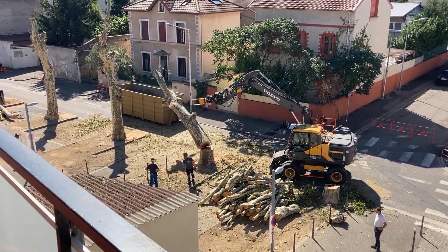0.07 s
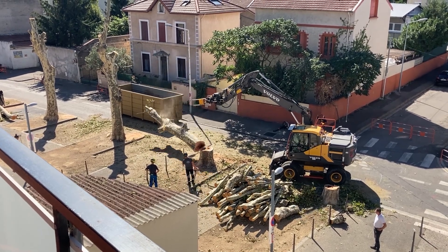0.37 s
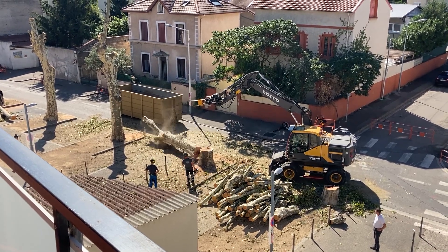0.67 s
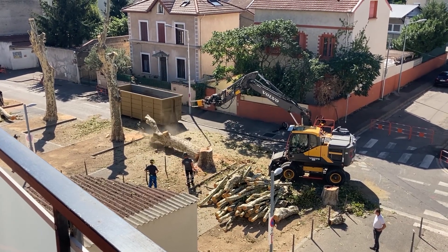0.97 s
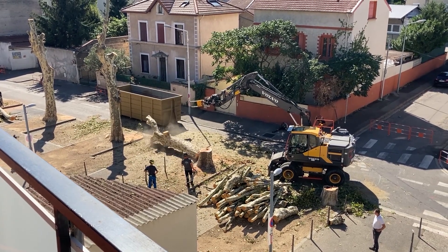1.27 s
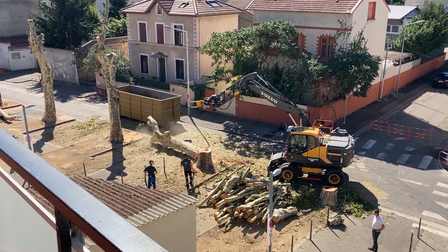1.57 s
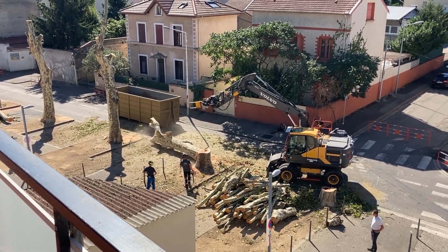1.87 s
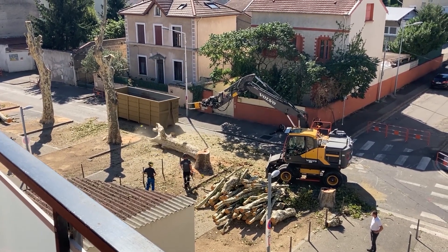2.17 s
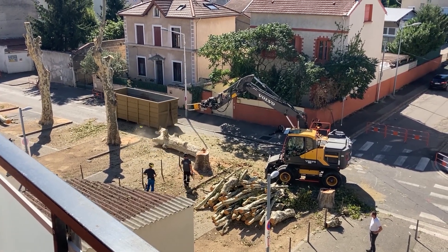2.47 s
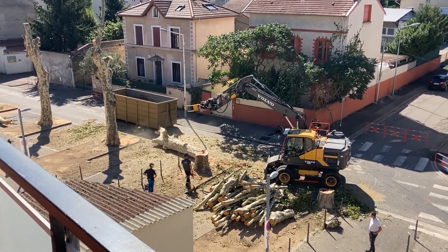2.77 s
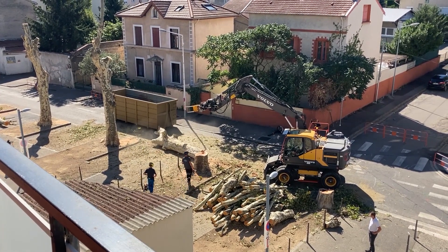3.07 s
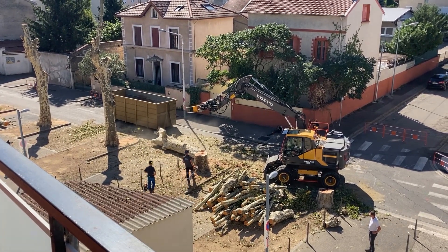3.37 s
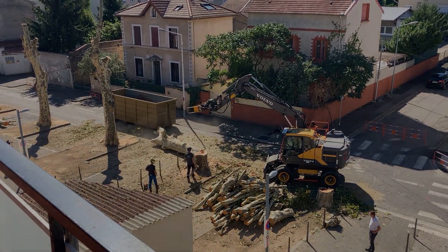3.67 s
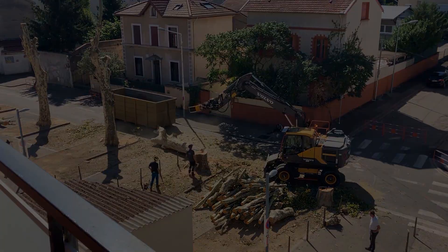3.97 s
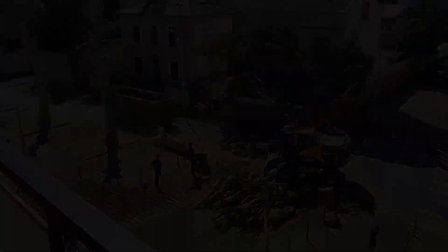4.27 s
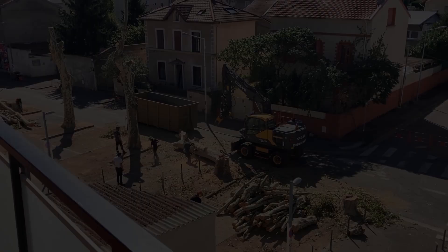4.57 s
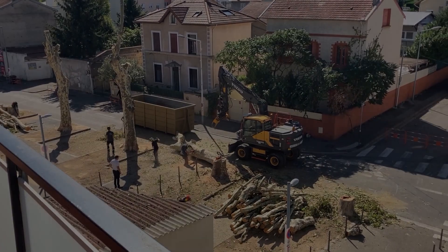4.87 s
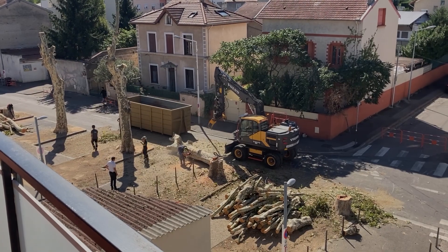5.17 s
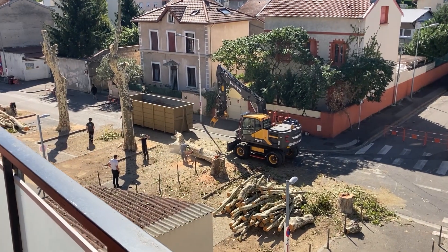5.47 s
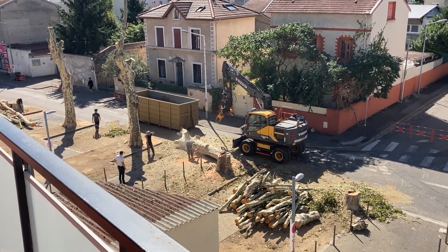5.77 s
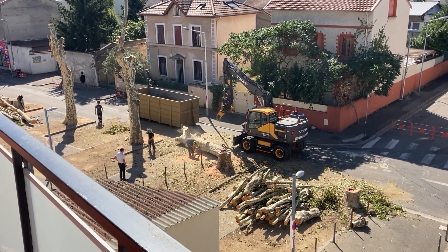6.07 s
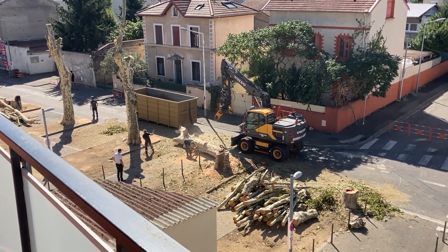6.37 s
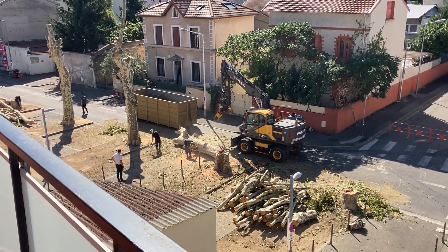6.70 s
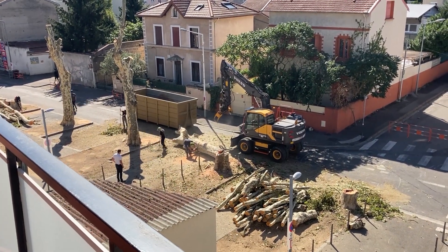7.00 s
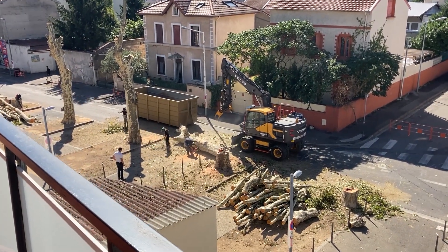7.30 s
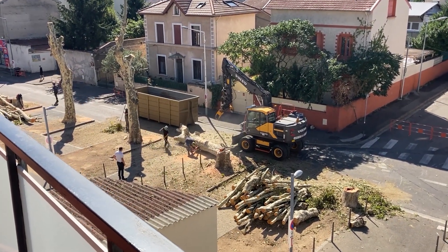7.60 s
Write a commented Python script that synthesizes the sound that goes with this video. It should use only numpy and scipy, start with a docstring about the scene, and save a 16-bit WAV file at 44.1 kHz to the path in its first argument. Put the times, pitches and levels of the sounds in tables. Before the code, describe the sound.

An excavator idles in the background of a street between houses. A felled tree trunk crashes to the ground and bounces, with deep thuds, ringing wood and crunching bark echoing off the house fronts, then rolls over with softer knocks. The street fades out and a loud, close chainsaw cuts in, its pitch sagging and rising as it tears wood and sprays hissing chips. Heard in stereo.

```python
"""A street between houses, heard in stereo, with an excavator idling in the background.
A felled trunk crashes down, bounces and later rolls over: the ground thuds, the log rings, bark crunches
and the house fronts echo. The street fades out; after a cut, a two-stroke chainsaw is in the foreground.
Its exhaust pulses ring muffler and casing while the chain tears wood and sprays chips,
the engine sagging as the chain bites and picking up as it is eased."""
import sys
import numpy as np
from scipy import signal
from scipy.fft import rfft, irfft, next_fast_len
from scipy.io import wavfile
from scipy.ndimage import uniform_filter1d

SR = 44100
rng = np.random.default_rng(int(sys.argv[2]) if len(sys.argv) > 2 else 0)


def materialize(psi):
    """Save the field psi as 16-bit PCM at rate SR to the path in sys.argv[1].

    A 1-D psi becomes a single channel; in a 2-D psi each row is a channel.
    """
    bounded = np.clip(np.atleast_2d(psi).T, -1, 1)
    quanta = np.round(bounded * 32767).astype(np.int16)
    wavfile.write(sys.argv[1], SR, quanta)


N = 345744
TIME = np.arange(N) / SR

# Levels in the tables are relative; each source adds its own gain.
# hum of the idling diesel: (frequency [Hz], level [dB])
DIESEL_HUM = [(44.5, -58.5), (88, -51.5), (133, -42), (192, -45.5), (267, -52.5), (402, -49.5)]
# resonances in the excavator's running noise: (frequency [Hz], level [dB], t60 [s])
EXCAVATOR_MODES = [(750, -53, .04), (1720, -59, .034), (2000, -65, 0.037), (2720, -60.5, .012)]
# background noise of excavator and street: (frequency [Hz], density [dB])
STREET_NOISE = [(24, -18.5), (45, -7.5), (96, -15), (130, -3.5), (160, -5.5), (271, -8.5), (347, -13.5),
                (408, -10), (490, -23.5), (780, -16.5), (2160, -28.5), (4000, -33.5), (5900, -44),
                (7500, -39), (10000, -41), (15000, -54.5)]
# stereo width of the street at the microphone: (frequency [Hz], side minus mid [dB])
STREET_WIDTH = [(30, -10), (70, -13), (150, -9.5), (300, -7), (950, -1), (2400, -2), (6000, 6)]
# the trunk lands, bounces and rolls over: (time [s], thud [dB], log ring [dB], bark crunch [dB])
TRUNK_BLOWS = [(.563, -38, -23.5, -30), (.574, -26, -9, -10.5), (.583, -18.5, -11, -20),
               (.592, -31, -13.5, -35), (.62, -40, -21, -16), (.645, -30, -11, -21.5),
               (.701, -22.5, -14, -36), (.819, -25, -18.5, -25), (.894, -18.5, -24.5, -31),
               (.965, -21, -24, -25.5), (1.024, -32, -46, -30.5), (1.197, -33, -50, -35),
               (2.328, -32, -24, -34), (2.343, -30, -20.5, -29.5), (2.423, -28.5, -36, -40),
               (2.546, -34, -28.5, -44), (2.735, -27.5, -39, -43)]
# thud of the ground: (frequency [Hz], density [dB])
GROUND_THUD = [(18, -31), (32, -16.5), (47, 0), (66, 0), (85, -13.5), (115, -2.5), (170, -30.5),
               (400, -48.5)]
# modes of the log: (frequency [Hz], level [dB], t60 [s])
TRUNK_MODES = [(126.4, -7.5, 0.44), (164.9, 3.5, 0.43), (189.5, 0, 0.39), (215, -7.5, 0.28),
               (244.4, -9, 0.62), (276.5, -10.5, 0.58), (360, -1.5, 0.078), (423.7, -12.5, 0.47),
               (542, -17, 0.091), (680, -27, 0.12), (769, -15, .16)]
# bark being crushed: (frequency [Hz], density [dB])
BARK_CRUNCH = [(100, -1), (300, 7), (650, 4.5), (1200, -3.5), (2300, -9.5), (3800, -15.5), (5800, -28.5),
               (8000, -21.5), (10500, -24.5), (15000, -43)]
# deep boom that lingers between the houses: (frequency [Hz], level [dB], t60 [s])
STREET_MODES = [(50.14, -8, 3.1), (64.4, -20, 0.82)]
# stubs of limbs hit the ground: (time [s], level [dB], contact brightness [Hz])
LIMB_HITS = [(.575, -11.5, 5530), (.609, -13, 3400), (0.818, -16.5, 1800), (0.832, -14.5, 1600),
             (.975, -33, 3020)]
# modes of the limbs: (frequency [Hz], level [dB], t60 [s])
LIMB_MODES = [(812, -3.5, 0.12), (906, -6, 0.11), (1142, -9, 0.13), (1330, -11.5, 0.21),
              (1443, -10.5, 0.18), (1890, -4.5, 0.055), (2260, -10.5, .07), (2410, -8, 0.13),
              (2740, -17.5, .06), (4100, -11, 0.027)]
# two thin snaps of twig and chip, between them a faint longer high hiss: (time [s], level [dB], t60 [s])
SNAPS_AND_HISS = [(2.573, -46, 0.065), (3.55, -56, .9), (5.319, -25, 0.025)]
# high hiss, also the sound of the snaps and flying chips: (frequency [Hz], density [dB])
HIGH_HISS = [(3500, -9), (5300, -7.5), (6100, -9.5), (7200, -2), (9000, -7), (12000, -10.5), (15000, -25)]
# speed of the saw's engine: (time [s], firing rate [Hz])
SAW_SPEED = [(4.38, 198), (4.49, 203), (4.72, 207), (4.91, 180), (5.13, 162), (5.27, 161), (5.7, 165),
             (5.8, 180), (6.04, 197), (6.1, 193), (6.27, 166), (6.35, 160), (6.52, 165), (6.6, 181),
             (6.69, 186), (6.92, 194), (7.0, 175), (7.09, 183), (7.17, 183), (7.25, 157), (7.38, 167),
             (7.43, 157), (7.45, 159), (7.48, 138), (7.51, 138), (7.61, 159), (7.72, 153), (7.84, 170)]
# the chain snags, the engine misfires: (time [s], half width [s], added spread [dB], tone loss [dB])
CHAIN_SNAGS = [(5.783, 0.015, 1.2, 3), (6.262, 0.064, 2.0, 0), (7.219, .04, 3, 7), (7.513, 0.093, 3.2, 0),
               (7.694, 0.027, 1, 7)]
# stereo width of the saw at the microphone: (frequency [Hz], side minus mid [dB])
SAW_WIDTH = [(60, -1), (170, -21.5), (310, -11.5), (640, -3), (1400, -2), (3100, -1.5), (6000, 4.5)]
# exhaust response that the firing tone and its octave sweep through: (frequency [Hz], level [dB])
EXHAUST_RESPONSE = [(138, -29), (152, -30), (161, -14.5), (174, -18), (190, -14.5), (206, -16), (280, -34),
                    (322, -21.5), (362, -18.5), (384, -38.5), (402, -25.5), (416, -36)]
# response of the muffler: (frequency [Hz], level [dB])
MUFFLER_RESPONSE = [(380, -28), (470, 4), (545, -0.5), (640, -0.5), (710, 3.5), (770, -24), (860, -11),
                    (930, -0.5), (975, -3.5), (1060, -18), (1300, -12.5), (1480, -7), (1550, -19),
                    (1630, -9), (1800, -37)]
# narrow resonance of the muffler outlet: (frequency [Hz], level [dB])
OUTLET_RESPONSE = [(690, -53), (750, 0.5), (830, 1.5), (890, -52)]
# response of the engine casing: (frequency [Hz], level [dB])
CASING_RESPONSE = [(850, -9), (1120, 2.5), (1400, -2.5), (1520, 6.5), (1780, -2), (2080, 5), (2400, -1.5),
                   (2750, -4), (3100, -3), (3600, 4), (4200, -6.5), (4750, -9.5), (5380, -0.5), (6200, -22)]
# thin metal of guide bar and cover, singing at high revs: (frequency [Hz], level [dB], t60 [s])
BAR_MODES = [(2860, 5, 0.04), (3700, -11, 0.07), (4690, 6.5, 0.019), (5550, -16, 0.033)]
# the chain tearing wood: (frequency [Hz], density [dB])
CHAIN_SPECTRUM = [(25, -5), (60, -8.5), (150, -0.5), (350, 5), (700, 2.5), (1150, -2), (2300, 2),
                  (3700, 0.5), (4300, 0.5), (4750, -37), (5050, -39), (5400, -51), (6500, -91)]
# bar and cover rubbed into ringing by the chain: (frequency [Hz], level [dB], t60 [s])
CHAIN_RING = [(1478, -6, 0.049), (2080, -1.5, 0.011), (2430, -4.5, 0.014), (3633, -3.5, 0.018),
              (4706, -3.5, .03), (5345, -7, 0.024)]
# strength of the chip spray: (time [s], level [dB])
CHIP_LEVEL = [(4.39, -32.5), (4.65, -31), (5.03, -34), (6.04, -33.5), (6.34, -38), (7.36, -34.5),
              (7.43, -39), (7.6, -33), (7.65, -38), (7.72, -34), (7.82, -34.5)]

WORKING_HZ = 175   # firing rate about which the saw's levels rise and fall
LEFT_RIGHT = np.array([[1], [-1]])


def from_db(db):
    """Decibels to gain."""
    return 10 ** (np.asarray(db) / 20)


def rms_one(x):
    """Scale to an rms of 1."""
    return x / np.sqrt(np.mean(x ** 2) + 1e-20)


def at_hz(spectrum, hz):
    """Level of a spectrum at the given frequencies, in dB."""
    at, db = np.transpose(spectrum)
    return np.interp(np.log(hz), np.log(at), db)


def colour(x, spectrum):
    """Shape x by a spectrum that falls away steeply beyond both ends."""
    size = next_fast_len(N + 4096)
    hz = np.arange(size // 2 + 1) * SR / size + 1e-3
    ends = np.minimum(1, hz / spectrum[0][0]) ** 2 * np.minimum(1, spectrum[-1][0] / hz) ** 2
    return irfft(rfft(x, size) * ends * from_db(at_hz(spectrum, hz)), size)[..., :N]


def drift(rate_hz):
    """Random wander of spread 1, mostly slower than rate_hz."""
    r = np.exp(-80 * np.pi * rate_hz / SR)
    slow = signal.lfilter([1], [1, -2 * r, r * r], rng.standard_normal(N // 40 + 2002))[2000:]
    return np.interp(np.arange(N) / 40, np.arange(len(slow)), rms_one(slow))


def stereo(mid, side, width):
    """Left and right from a middle and a side signal."""
    return mid + colour(side, width) * LEFT_RIGHT


def noise(spectrum, width):
    """Coloured stereo noise whose middle has an rms near 1."""
    return stereo(*rms_one(colour(rng.standard_normal((2, N)), spectrum)), width)


def reflections(x, t60, first_s, count):
    """Two unrelated sets of scattered echoes off houses and nearby surfaces, each of unit energy."""
    out = []
    for delay, size in zip(rng.uniform(0, .8, (2, count)), rng.standard_normal((2, count))):
        echoes = np.zeros(int((first_s + t60) * SR) + 2)
        np.add.at(echoes, ((first_s + delay * t60) * SR).astype(int), size * from_db(-60 * delay))
        out.append(signal.fftconvolve(x, echoes / np.linalg.norm(echoes))[:N])
    return np.array(out)


def strikes(times, sizes):
    """One click for each contact."""
    clicks = np.zeros(N)
    clicks[(times * SR).astype(int)] = sizes
    return clicks


def ring(clicks, hz, t60):
    """A unit click sets a sine of height 1 ringing."""
    r, w = from_db(-60 / (t60 * SR)), 2 * np.pi * hz / SR
    return signal.lfilter([0, np.sin(w)], [1, -2 * r * np.cos(w), r * r], clicks + 1e-18)


def rubbed(modes):
    """Modes kept ringing by noise, each at its own rms level."""
    return sum(from_db(db) * rms_one(ring(rng.standard_normal(N), hz, t60)) for hz, db, t60 in modes)


def bursts(times, levels_db, t60, rise_s):
    """Envelope of overlapping bursts that rise quickly and die away."""
    power = np.zeros(N)
    for s, db, decay_s in np.broadcast(times, levels_db, t60):
        start = int(s * SR)
        age = TIME[:N - start][:2 * SR]
        burst = from_db(db - 60 * age / decay_s) * (1 - np.exp(-age / rise_s))
        power[start:start + len(age)] += burst ** 2
    return np.sqrt(power)


def excavator(noise_db=-36.5, knock=0.035, waver_db=2.0, wander_rad=0.8):
    """A diesel idles in the background: wavering hum over noise that throbs with the firings."""
    hum = 0
    for hz, db in DIESEL_HUM:
        height = np.sqrt(2) * from_db(db + waver_db * drift(10))
        hum = hum + height * np.sin(2 * np.pi * hz * TIME + wander_rad * drift(0.86))
    throb = 1 + knock * np.cos(2 * np.pi * DIESEL_HUM[0][0] * TIME)
    return hum + rubbed(EXCAVATOR_MODES) + from_db(noise_db) * throb * noise(STREET_NOISE, STREET_WIDTH)


def trunk(ring_db=-2.5, limb_db=-5.5, wood_echo_db=-6.5, crunch_echo_db=-8.0):
    """Each blow shakes the ground, rings the log and crushes bark; the house fronts answer."""
    times, thud_db, wood_db, crunch_db = np.transpose(TRUNK_BLOWS)
    thud = noise(GROUND_THUD, STREET_WIDTH) * bursts(times, thud_db, t60=0.63, rise_s=0.0067)
    blows = strikes(times, from_db(wood_db + ring_db))
    log = sum((-1) ** k * from_db(db) * ring(blows, hz, t60)
              for k, (hz, db, t60) in enumerate(TRUNK_MODES))
    wood = log + from_db(limb_db) * limb_clacks()
    crunch = bark_crunch(times, crunch_db)
    to_houses = from_db(wood_echo_db) * wood + from_db(crunch_echo_db) * crunch.mean(axis=0)
    echoes = reflections(to_houses, t60=1.0, first_s=.008, count=900)
    return thud + wood + crunch + stereo(*echoes, STREET_WIDTH)


def bark_crunch(times, crunch_db, t60=0.2, splinter_hz=1400, lift_db=2.5, loss_per_db=0.18):
    """Bark gives way under each blow; the harder the blow, the more brightly it splinters."""
    grit = noise(BARK_CRUNCH, STREET_WIDTH)
    dull = signal.sosfiltfilt(signal.butter(2, splinter_hz, fs=SR, output="sos"), grit)
    splinter_db = crunch_db + lift_db + loss_per_db * (crunch_db - crunch_db.max())
    splinters = (grit - dull) * bursts(times, splinter_db, t60, rise_s=0.0019)
    return dull * bursts(times, crunch_db, t60, rise_s=0.0018) + splinters


def street_boom():
    """The ground thuds set the lowest resonances of the street going."""
    times, thud_db = np.transpose(TRUNK_BLOWS)[:2]
    thuds = strikes(times, from_db(thud_db))
    return sum(from_db(db) * ring(thuds, hz, t60) for hz, db, t60 in STREET_MODES)


def limb_clacks(gap_s=.015, rebound_loss_db=6, spread_db=3.5):
    """Each stub knocks and rebounds twice; a softer contact leaves the high modes quiet."""
    knocks = [(s + k * gap_s * rng.uniform(0.63, 1.2), db - k * rebound_loss_db, hz)
              for s, db, hz in LIMB_HITS for k in range(3)]
    times, db, bright_hz = np.transpose(knocks)
    scatter_db = spread_db * rng.standard_normal((len(times), len(LIMB_MODES)))
    out = 0
    for k, (hz, mode_db, t60) in enumerate(LIMB_MODES):
        sizes = from_db(db + mode_db + scatter_db[:, k]) / (1 + (hz / bright_hz) ** 2)
        out = out + (-1) ** k * ring(strikes(times, sizes), hz, t60)
    return out


def snaps_and_hiss():
    """Two thin snaps of twig and chip, and a faint longer hiss, perhaps the excavator's hydraulics."""
    return noise(HIGH_HISS, SAW_WIDTH) * bursts(*np.transpose(SNAPS_AND_HISS), rise_s=0.00044)


def chainsaw(left_db=0.9, labour_hz=162, labour_db_per_hz=0.15):
    """The saw in the foreground, slightly left: engine, chain and chips all pulse with the crank."""
    speed = np.interp(TIME, *np.transpose(SAW_SPEED))
    uneven_db, loss_db = misfires()
    labour_db = labour_db_per_hz * np.minimum(speed - labour_hz, 0)   # dragged down, it loses power
    turns = np.cumsum(speed * (1 + .0011 * uneven_db * drift(20))) / SR
    angle = 2 * np.pi * turns
    drone = exhaust_drone(speed, angle, uneven_db, loss_db)
    pulses = firings(turns, uneven_db)
    exhaust = muffler(pulses, speed) + from_db(-.5 * loss_db) * outlet(pulses, speed)
    rasp = from_db(.5 * labour_db - 0.18 * loss_db) * cutting_rasp(pulses, speed, angle)
    machine = from_db(labour_db) * exhaust + rasp + fan(speed, angle)
    return drone + machine * from_db(left_db * LEFT_RIGHT) + chip_spray(angle)


def misfires(steady_spread_db=1.57):
    """Snags briefly widen the spread of the firing strength; some also weaken the firing tone."""
    uneven_db, loss_db = steady_spread_db, 0
    for s, half_width_s, spread_db, dip_db in CHAIN_SNAGS:
        snag = np.exp(-((TIME - s) / half_width_s) ** 2)
        uneven_db, loss_db = uneven_db + spread_db * snag, loss_db + dip_db * snag
    return uneven_db, loss_db


def exhaust_drone(speed, angle, uneven_db, loss_db, octave_waver_db=2.0):
    """The firing tone and its octave sweep through the exhaust's response."""
    tone_db = at_hz(EXHAUST_RESPONSE, speed) - loss_db
    octave_db = at_hz(EXHAUST_RESPONSE, 2 * speed) - 0.17 * loss_db + octave_waver_db * drift(9.1)
    slip = 0.41 * drift(4.9)   # the octave slips in phase as the saw moves
    octave = from_db(octave_db) * np.exp(1j * (2 * angle + slip))
    tones = -np.sqrt(2) * (from_db(tone_db) * np.exp(1j * angle) + octave)
    return stereo(tones.real, tones.imag, SAW_WIDTH) * from_db(.5 * uneven_db * drift(11))


def firings(turns, uneven_db, jitter=.000006):
    """One click a turn; the more uneven its strength, the further it also strays in time."""
    at = np.interp(np.arange(1, int(turns[-1])), turns, np.arange(N))
    spread_db = uneven_db[at.astype(int)]
    stray, strength = rng.standard_normal((len(at), 2)).T
    at = np.clip(at + jitter * SR * spread_db ** 2 * stray, 0, N - 2)
    size = from_db(spread_db * strength)
    whole, clicks = at.astype(int), np.zeros(N)
    clicks[whole] += size * (1 - at % 1)
    clicks[whole + 1] += size * (at % 1)
    return clicks


def hold_level(x):
    """Hold the short-term level at 1."""
    power = uniform_filter1d(x ** 2, size=2200, axis=-1)
    return x / np.sqrt(np.abs(power) + 1e-4 * np.mean(x ** 2))


def radiate(pulses, body, t60, echo):
    """Pulses ring a body; reflections shift as the saw moves, so each overtone swells and fades."""
    direct = colour(pulses, body)
    first, second = reflections(direct, t60, first_s=.002, count=70)
    sway = 0.58 * drift(2.8)
    mid = direct + echo * (np.cos(sway) * first + np.sin(sway) * second)
    side = np.cos(sway) * second - np.sin(sway) * first
    return stereo(hold_level(mid), hold_level(side), SAW_WIDTH)


def muffler(pulses, speed, working_db=-30.5, db_per_hz=-0.0879, waver_db=2.5):
    """Exhaust pulses bark through the muffler, more softly at high revs."""
    level_db = working_db + db_per_hz * (speed - WORKING_HZ) + waver_db * drift(12)
    return from_db(level_db) * radiate(pulses, MUFFLER_RESPONSE, t60=.35, echo=1.0)


def outlet(pulses, speed, peak_hz=800, half_width_hz=20, peak_db=-24.5, db_per_hz=0.1417):
    """The muffler outlet sings when an engine overtone comes near its resonance."""
    detune_hz = speed * np.round(peak_hz / speed) - peak_hz
    off_peak_db = 10 * np.log10(1 + (detune_hz / half_width_hz) ** 2)
    dropout_db = 4.5 * np.maximum(drift(5.7), 0) ** 2   # now and then the ring drops away
    level_db = peak_db + db_per_hz * (speed - WORKING_HZ) - off_peak_db - dropout_db
    return from_db(level_db) * radiate(pulses, OUTLET_RESPONSE, t60=0.18, echo=0.67)


def cutting_rasp(pulses, speed, angle, working_db=-29.5, db_per_hz=0.0466, ring_db=-9.5, bite_s=4.67):
    """The casing buzzes while the chain tears wood and rubs the bar; tearing grows as the revs sag."""
    buzz = radiate(pulses, CASING_RESPONSE, t60=.1, echo=6.1) + bar_whine(pulses, speed)
    chain = (1 + 0.063 * np.cos(angle)) * noise(CHAIN_SPECTRUM, SAW_WIDTH)
    tearing = np.interp(speed, [145, 165, 195], [.5, .35, .25])   # the chain's share of the power
    rasp = np.sqrt(1 - tearing) * buzz + np.sqrt(tearing) * chain + from_db(ring_db) * rubbed(CHAIN_RING)
    bite_db = 2.5 * np.exp(-((TIME - bite_s) / .11) ** 2)   # one deeper bite makes the rasp surge
    return from_db(working_db + db_per_hz * (speed - WORKING_HZ) + bite_db) * rasp


def bar_whine(pulses, speed, free_db=-4.0, db_per_hz=.25, free_hz=195):
    """The bar's modes pick out overtones of the engine, more strongly the faster it runs."""
    modes = sum(from_db(db) * ring(pulses, hz, t60) for hz, db, t60 in BAR_MODES)
    return from_db(free_db + db_per_hz * np.minimum(speed - free_hz, 0)) * rms_one(modes)


def fan(speed, angle, order=18, working_db=-43, db_per_hz=0.0438, waver_db=0.5):
    """The flywheel's vanes sing one high multiple of the engine speed."""
    level_db = working_db + db_per_hz * (speed - WORKING_HZ) + waver_db * drift(14)
    return from_db(level_db) * np.sin(order * angle)


def chip_spray(angle, gain_db=1.0, grain_db=1.14, pulsing=0.24, echo=0.73):
    """Chips hiss in step with the engine, coloured by a few reflections off nearby surfaces."""
    level_db = np.interp(TIME, *np.transpose(CHIP_LEVEL)) + gain_db + grain_db * drift(360)
    hiss = noise(HIGH_HISS, SAW_WIDTH)
    near = reflections(hiss.mean(axis=0), t60=.03, first_s=0.0011, count=10)[0]
    spray = (hiss + echo * near) / np.sqrt(1 + echo ** 2)
    return from_db(level_db) * (1 + pulsing * np.cos(angle)) * spray


def microphone(x, crossover_hz=6000, lag_s=.00022):
    """In the treble both channels carry one signal, later and inverted on the left."""
    size = next_fast_len(N + 4096)
    both = rfft(x, size)
    hz = np.arange(size // 2 + 1) * SR / size
    low_share = 1 / (1 + (hz / crossover_hz) ** 20)
    ports = np.array([-np.exp(-2j * np.pi * hz * lag_s), np.ones(len(hz))])
    treble = np.sqrt(1 - low_share) * ports * both.mean(axis=0)
    return irfft(np.sqrt(low_share) * both + treble, size)[:, :N]


def scene(felling_db=0.52, fade_start_s=3.607, fade_end_s=4.33, floor_db=-50.5, cut_s=4.373):
    """The felling in the street fades out, then the sawing cuts in."""
    fade = np.clip((fade_end_s - TIME) / (fade_end_s - fade_start_s), 0, 1) ** 2 + from_db(floor_db)
    cut = np.clip((TIME - cut_s) / 0.00034, 0, 1)
    felling = (excavator() + trunk() + street_boom()) * from_db(felling_db) * fade
    return felling * (1 - cut) + snaps_and_hiss() + chainsaw() * cut


def record(dry, ceiling=.95, stopband_hz=17200):
    """The microphone's sound, with the highest peaks rounded and the top cut."""
    heard = microphone(dry)
    rounded = heard / (1 + (heard / ceiling) ** 6) ** (1 / 6)
    return signal.sosfilt(signal.cheby2(12, 70, stopband_hz, fs=SR, output="sos"), rounded)


dry = scene()
out = record(dry)
materialize(out)
```